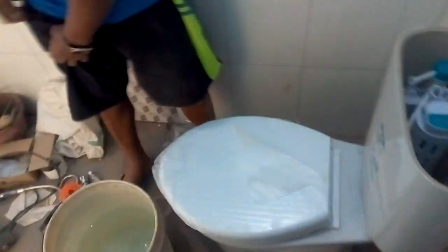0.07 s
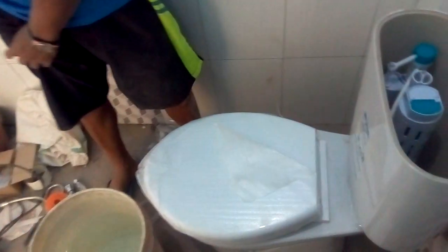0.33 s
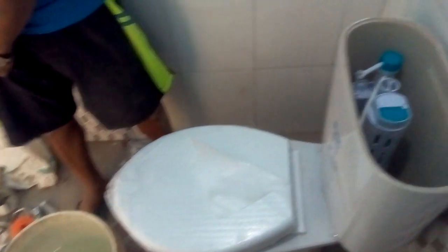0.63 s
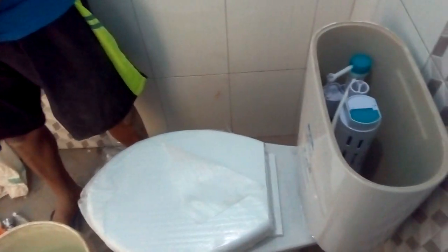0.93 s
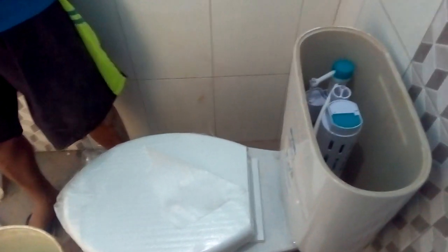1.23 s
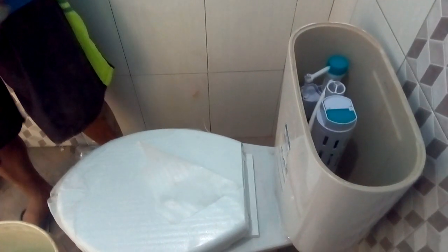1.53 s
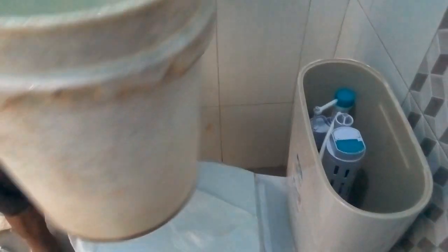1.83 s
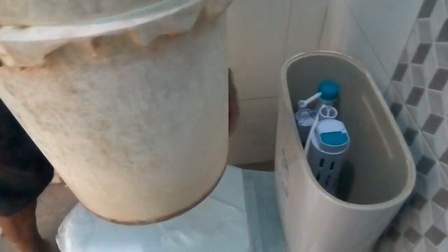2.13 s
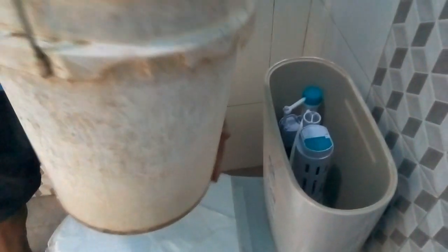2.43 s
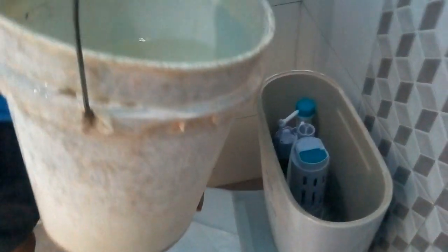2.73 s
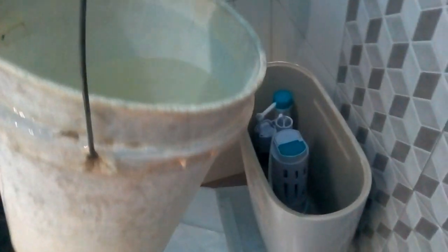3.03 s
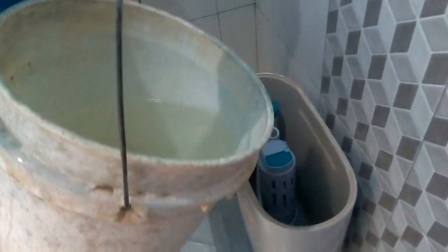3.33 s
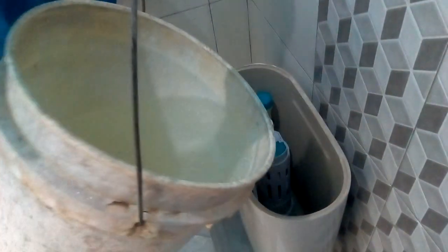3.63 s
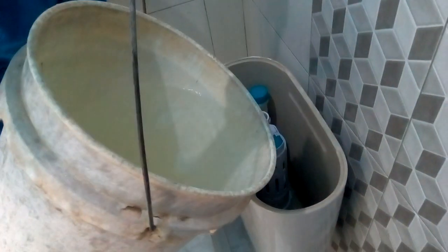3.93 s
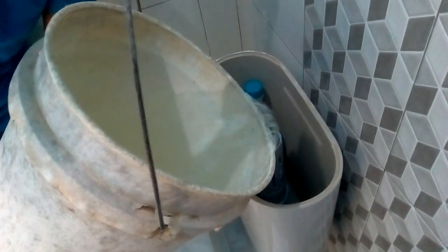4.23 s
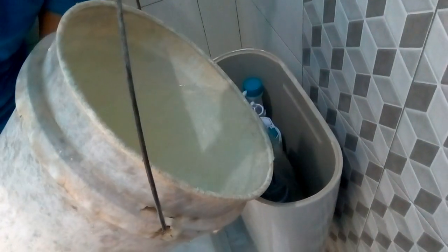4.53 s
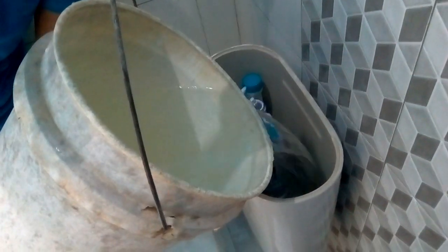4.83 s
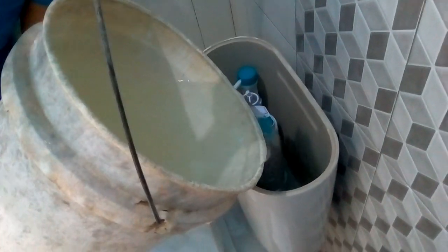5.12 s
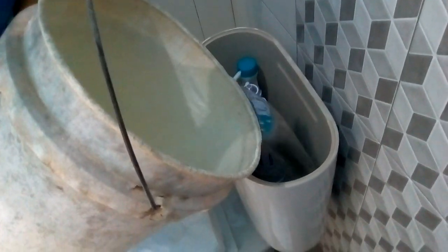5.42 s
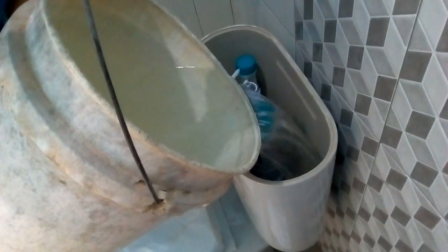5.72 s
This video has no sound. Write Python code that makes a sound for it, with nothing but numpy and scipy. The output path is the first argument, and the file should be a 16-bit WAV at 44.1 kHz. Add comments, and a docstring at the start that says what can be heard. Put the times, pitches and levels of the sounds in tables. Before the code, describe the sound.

In a small tiled bathroom, clothes and hands rustle faintly over a low room rumble, with one brief swish as a full plastic bucket is lifted. The bucket knocks on the rim of an open toilet tank with a hollow, ringing boom. A few spills slap inside, then water pours in surges, splashing, bubbling and drumming on the tank. The microphone is close, just above the tank.

```python
"""Water pours from a plastic bucket into an open toilet cistern in a small tiled bathroom.
The stream surges as the water rocks in the bucket: spray crackles, bubbles ring, the jet drums on the tank.
Before the pour, clothes and hands rustle, the wire handle pings, the bucket knocks on the rim and booms,
and the first spills slap into the tank. The tiles ring on over a low room rumble."""
import sys
import numpy as np
from scipy import signal
from scipy.fft import rfft, irfft, next_fast_len
from scipy.io import wavfile
from scipy.ndimage import map_coordinates

SR = 44100
rng = np.random.default_rng(int(sys.argv[2]) if len(sys.argv) > 2 else 0)


def pcm_store(signal):
    """Save signal as 16-bit PCM."""
    levels = np.round(np.clip(np.atleast_2d(signal), -1, 1) * 32767)
    wavfile.write(sys.argv[1], SR, levels.astype(np.int16).T)


N = 258426

# stream strength: time_s, level_db
FLOW = [(4.7, -40.5), (4.8, -45.5), (4.86, -34), (4.935, -34), (5.0, -23), (5.13, -27.5), (5.21, -31.5),
        (5.3, -30), (5.39, -34.5), (5.415, -26.5), (5.57, -22), (5.7, -28), (5.86, -23.5)]
# air pockets dragged down by the jet: start_s, level_db
GULPS = [(5.525, -35.5), (5.655, -38), (5.8, -33)]
# spectra of spray, plunging jet, deep churn, drummed tank, bright spit: freq_hz, gain_db
SPRAY_EQ = [(300, -40), (1500, -50), (2500, -15), (3600, 0.5), (5500, 2), (8000, -2), (16000, 1)]
PLUNGE_EQ = [(300, -14.5), (800, -19.5), (1250, 0.5), (2400, 4.5), (3500, 3.5), (7000, -50)]
CHURN_EQ = [(200, -32), (400, -17.5), (550, -7.5), (850, 2.5), (1200, -12.5), (2500, -30)]
TANK_EQ = [(30, -52), (70, -30), (110, -14), (165, 5), (240, 2), (290, -6.5), (350, -3), (450, -14),
           (700, -37), (2000, -54)]
SPIT_EQ = [(2000, -32), (6000, -12), (9000, 0), (16000, -0.5)]
# water sheets hitting the tank: start_s, level_db, centre_hz, width_oct, t30_s
SLAPS = [(4.0767, -26.5, 5200, 0.54, 0.015), (4.09, -31.5, 5350, 0.3, 0.032),
         (4.117, -34, 6000, 0.36, 0.023), (4.312, -34, 5500, 0.57, 0.055), (4.34, -31.5, 4350, 0.23, 0.091),
         (4.5852, -18, 4200, 0.31, 0.045), (4.601, -19.5, 4900, 0.63, 0.089),
         (4.691, -20.5, 6000, 0.81, .015), (4.839, -25, 5040, 0.63, 0.084), (4.968, -25, 4300, 0.49, 0.084),
         (5.008, -23, 4440, 0.7, 0.009), (5.126, -14.5, 5100, 0.32, 0.023),
         (5.146, -23, 5240, 0.063, 0.047), (5.399, -20, 3870, 0.34, 0.025),
         (5.417, -21.5, 4270, 0.38, 0.11), (5.477, -25.5, 1650, 0.31, 0.04),
         (5.523, -20.5, 1420, 0.58, 0.092), (5.816, -18.5, 4180, 0.62, 0.033)]
# large bubbles: start_s, level_db, pitch_hz, t60_s
PLOPS = [(4.712, -26.5, 1684, 0.026), (4.886, -39, 1780, .04), (4.953, -36, 1310, 0.026),
         (4.995, -14.5, 2370, 0.034), (5.16, -22.5, 2720, 0.047), (5.2368, -14.5, 2870, 0.027),
         (5.247, -24, 830, 0.041), (5.2877, -16.5, 2554, 0.067), (5.532, -20, 1520, .04),
         (5.7222, -17, 2320, 0.046)]
# bucket hits the rim, then rocks back: start_s, boom_db, crack_db, cutoff_hz
KNOCKS = [(4.119, -15, -14, 6000), (4.2118, -23.5, -32, 700)]
# modes of the full bucket: pitch_hz, level_db, t60_s, rise_s
BUCKET_MODES = [(345.3, 1, 1, 0.0014), (879, 11, 0.059, 0.0025), (864, -9.5, 0.79, 0.0018),
                (2330, -3.5, 0.039, .001)]
# standing waves of tank and room: pitch_hz, level_db, t60_s
STANDING_WAVES = [(101.4, -31.5, 2.1), (176.2, -18, 1.32), (213.7, -16, 1.14), (245, -8.5, 1.42),
                  (313, -12, 1.25), (319, -7.5, 1.12), (335, -13, 1.07), (343.8, -10.5, 1.53),
                  (371, -16.5, 1.3), (392, -9.5, 0.98), (422.5, -11, 1.16), (435, -19, 1.4),
                  (449, -19, 1.3), (698, -23.5, 1.2), (713, -24.5, 0.97), (767, -20, .7),
                  (826, -19.5, 0.95), (844, -20, 1.3), (890, -17.5, 1.25), (1033, -21, 0.88),
                  (1148, -21, 0.62), (1580, -22, 0.6), (1790, -29, .6)]
# spectra of rim contact, plastic wall, rubbed cloth, sliding swish: freq_hz, gain_db
CRACK_EQ = [(30, -10), (150, -10.5), (350, 12), (560, -5.5), (880, 4.5), (1150, 1.5), (1380, -18),
            (1650, -2.5), (2000, -7.5), (2350, -9), (2900, -14.5), (5000, -14.5), (9000, -31), (16000, -41)]
WALL_EQ = [(200, -22), (400, 1.5), (560, -7.5), (870, 9.5), (1100, 1), (1350, -6), (1600, 1.5), (1950, -4),
           (2300, -1), (3000, -9.5), (9000, -23.5)]
CLOTH_EQ = [(100, -14.5), (300, 7.5), (600, -3), (1300, 0.5), (3000, -2.5), (5500, -0.5), (9000, -10.5),
            (16000, -8)]
SLIDE_EQ = [(300, -54), (750, -22), (1100, -6.5), (1600, 4), (2800, 3.5), (5500, 5), (9000, -4.5),
            (16000, -7.5)]
# strokes of clothes and hands: centre_s, level_db, width_s
RUBS = [(0.154, -44.5, 0.24), (0.523, -51.5, 0.23), (0.719, -58, 0.18), (1.134, -55, 0.12),
        (1.3, -53, 0.22), (1.776, -54.5, 0.22), (2.09, -57, 0.17), (2.203, -49, 0.075), (2.342, -47, 0.11),
        (2.63, -58, 0.15), (3.42, -59.5, 0.33)]
# reaching for the bucket, swinging it over: start_s, peak_s, level_db
SWISHES = [(0.0, 0.026, -43), (2.8, 2.981, -31)]
# grip shifts: start_s, level_db, t15_s
GRIPS = [(0.127, -61, 0.17), (0.518, -78, 0.071), (1.128, -65, 0.018), (2.182, -47, 0.033),
         (2.323, -51, 0.1), (3.7, -60.5, .07)]
# room rumble: time_s, level_db
RUMBLE = [(0.1, -54), (1.0, -57.5), (2.2, -55), (5.8, -53.5)]
# rumble spectrum: freq_hz, gain_db
RUMBLE_EQ = [(20, -24), (45, -6.5), (70, -4), (105, 3), (140, 0), (190, -1), (260, -9.5), (370, -13.5),
             (520, -18.5), (1200, -25.5), (4000, -53)]
# swells of room hum: centre_s, level_db, width_s, pitch_hz
HUMS = [(0.3, -59, 0.81, 187.8), (1.25, -58.5, 0.54, 220), (1.824, -53.5, 0.41, 94.8),
        (2.1, -61.5, 0.69, 378), (2.5, -56.5, 1.35, 188.6), (2.7, -55.5, 0.35, 95.5),
        (3.764, -49.5, 0.32, 111.3), (4.6, -56, 1.36, 96.3)]
# decay of the tiled room: freq_hz, t60_s
TILE_DECAY = [(150, 1.0), (800, 1), (2000, 0.53), (4500, 0.66), (9000, 0.92), (15000, 0.9)]
# microphone treble shelf: freq_hz, gain_db
MIC_EQ = [(6500, 0.5), (7100, -5.5), (7700, -13), (8500, -17.5), (11000, -20.5), (14000, -24), (14800, -12),
          (16000, -16.5)]

POUR_S, FULL_FLOW_DB, PLUNGE_LAG_S = 4.62, -25, 0.021
CHURN_DB_PER_S, DRUM_DB_PER_S = 14, 3.5  # growth as the tank fills
SETTLED_S, CHOKE_S = 4.228, 0.033  # bucket rests on the rim
STILL_S, STILL_DB_PER_S = 3.03, 23  # body steadies for the pour
SWISH_RISE_DB_PER_S, SWISH_FALL_DB_PER_S = 92, 102.5
BAND_LIMIT_HZ = 15600


def stream():
    """Spray crackles on the walls; the jet drives in bubbles and drums, deeper as the tank fills."""
    t = np.arange(N) / SR
    flow_db = np.interp(t, *np.transpose(FLOW))
    surge_db = np.interp(t - PLUNGE_LAG_S, t, flow_db) - FULL_FLOW_DB
    filling_s = np.maximum(t - POUR_S, 0)
    gulps = sum(amp(db) * fade_in(s, 0.014) * np.exp(-np.maximum(t - s, 0) / 0.053) for s, db in GULPS)
    plunge_gain = amp(-31 + 1.15 * surge_db)
    churn_gain = np.hypot(amp(-56 + 0.25 * surge_db + CHURN_DB_PER_S * filling_s), gulps)
    drum_gain = np.hypot(amp(-54.5 + DRUM_DB_PER_S * filling_s), amp(-5.5) * gulps)
    crackle = bubble_cloud(1880, 14400, cycles=3.5, spread_db=5, glide=0.11, count=18000, samples=128)
    fizz = bubble_cloud(2516, 7730, cycles=69, spread_db=5, glide=0.092, count=3500, samples=800)
    froth = bubble_cloud(904, 3420, cycles=20, spread_db=3.5, glide=0.13, count=5000, samples=800)
    gurgle = bubble_cloud(400, 1390, cycles=21, spread_db=2, glide=0.22, count=1400, samples=1600)
    near_drops = bubble_cloud(6000, 16000, cycles=5, spread_db=1.5, glide=0.1, count=100, samples=128)
    spatter = amp(-38) * unit(colour(tiled(near_drops, wet_db=-3.5)[:N], SPIT_EQ))
    mist = tiled(crackle + amp(-6) * fizz, wet_db=4.5)[:N]
    spray = amp(flow_db) * unit(colour(mist, SPRAY_EQ))
    plunge = plunge_gain * unit(colour(tiled(froth, wet_db=3)[:N], PLUNGE_EQ))
    churn = churn_gain * unit(colour(tiled(gurgle, wet_db=-1.5)[:N], CHURN_EQ))
    drum = drum_gain * noise(TANK_EQ)
    return fade_in(POUR_S, 0.054) * (spray + spatter + plunge + churn + drum)


def bubble(t, hz, t60_s, glide):
    """A bubble rings; its pitch climbs as it nears the surface."""
    chirp = 1 + glide * np.minimum(t / t60_s, 1) / 2
    return np.sin(2 * np.pi * hz * t * chirp) * amp(-60 * t / t60_s)


def bubble_cloud(low_hz, high_hz, cycles, spread_db, glide, count, samples):
    """Bubbles of random onset, size and strength; rms 1."""
    onset, pitch, strength = rng.random((count, 3)).T[:, :, None]
    hz = low_hz * (high_hz / low_hz) ** pitch
    rings = bubble(np.arange(samples) / SR, hz, cycles / hz, glide) * np.sqrt(hz)
    rings *= amp(spread_db * np.minimum(-np.log(1 - strength), 4))
    index = (onset * N).astype(int) + np.arange(samples)
    return unit(np.bincount(index.ravel(), rings.ravel(), N)[:N])


def slaps():
    """Water sheets burst on the tank in spiky sprays, each opened by a bright spit."""
    out, t = np.zeros(N), np.arange(SR // 4) / SR
    hz = np.geomspace(100, 16000, 40)
    for start_s, db, centre_hz, width_oct, t30_s in SLAPS:
        octaves = np.log2(hz / centre_hz)
        band_db = -13 * np.log1p((octaves / width_oct) ** 2 / 2)
        mist_db = 8 * np.maximum(octaves, 0)
        droplets = rng.standard_normal(len(t)) * amp(7.1 * rng.standard_normal(len(t)))
        burst = unit(colour(droplets, np.c_[hz, band_db + mist_db]))
        burst *= amp(-30 * t / t30_s) * attack(t, 0.00063)
        spit = amp(-5 - 30 * t / 0.005) * noise(SPIT_EQ, len(t))
        add(out, start_s, amp(db) * tiled(burst + spit, wet_db=-0.5))
    return out


def plops():
    """Large trapped bubbles break into ringing clusters of four."""
    out, t = np.zeros(N), np.arange(SR // 8) / SR
    for start_s, db, hz, t60_s in PLOPS:
        cluster = np.zeros(len(t))
        for k, (detune, lag) in enumerate(rng.standard_normal((4, 2))):
            ring = bubble(t, hz * 1.035 ** (detune * np.sqrt(k)), t60_s, glide=0.15) * attack(t, 0.001)
            add(cluster, k * (0.004 + 0.002 * abs(lag)), amp(-3 * k) * ring)
        add(out, start_s, amp(db - 4) * tiled(cluster, wet_db=-1.5))
    return out


def rim_knocks():
    """Each contact cracks and the bucket booms until the rim chokes it; tank and room ring on."""
    out, t = np.zeros(N), np.arange(SR) / SR
    for start_s, boom_db, crack_db, cutoff_hz in KNOCKS:
        body = sum(mode(t, hz, db, t60_s) * attack(t, rise_s) / (1 + (hz / cutoff_hz) ** 2)
                   for hz, db, t60_s, rise_s in BUCKET_MODES)
        body *= np.exp(-np.maximum(start_s + t - SETTLED_S, 0) / CHOKE_S)
        waves = sum(mode(t, hz, db, t60_s, phase=rng.uniform(0, 2 * np.pi))
                    for hz, db, t60_s in STANDING_WAVES)
        waves *= attack(t, 0.021)
        upper_modes = noise(WALL_EQ, SR) * amp(-16 - 60 * t / 1.18) * attack(t, 0.012)
        crack = noise(CRACK_EQ, SR) * amp(-60 * t / 0.07) * attack(t, 0.0012)
        add(out, start_s, amp(boom_db) * (body + waves + upper_modes))
        add(out, start_s - 0.003, amp(crack_db) * tiled(crack, wet_db=3.5))
    return out


def rustle():
    """Cloth and skin friction: light brushing, strokes and brighter sliding swishes."""
    t = np.arange(N) / SR
    brush = amp(-60 - STILL_DB_PER_S * np.maximum(t - STILL_S, 0))
    rub = np.sqrt(brush ** 2 + sum((amp(db) * swell(s, width_s)) ** 2 for s, db, width_s in RUBS))
    swish = np.zeros(N)
    for start_s, peak_s, db in SWISHES:
        drop_db = np.maximum(SWISH_RISE_DB_PER_S * (peak_s - t), SWISH_FALL_DB_PER_S * (t - peak_s))
        swish += fade_in(start_s, 0.004) * amp(db - drop_db)
    fibres = amp(0.61 * wobble(120))
    return fibres * (amp(1) * rub * noise(CLOTH_EQ) + swish * noise(SLIDE_EQ))


def grips():
    """Fingers scrape the plastic wall, which rings briefly."""
    out, t = np.zeros(N), np.arange(SR // 2) / SR
    ring = mode(t, hz=852, db=-4.5, t60_s=0.45)
    press = attack(t, 0.0066)
    for start_s, db, t15_s in GRIPS:
        scrape = noise(WALL_EQ, len(t)) * amp(-15 * t / t15_s)
        add(out, start_s, amp(db) * (tiled(scrape * press, wet_db=-4)[:len(t)] + ring * press))
    return out


def handle_ping(slip_s=2.6):
    """The wire handle scrapes in its lug and rings thinly."""
    t = np.arange(SR // 4) / SR
    out = amp(-51) * swell(slip_s, width_s=0.08) * noise(SPIT_EQ)
    add(out, slip_s, tiled(mode(t, hz=12150, db=-50, t60_s=0.18), wet_db=-10))
    return out


def tiled(x, wet_db):
    """x plus tile echoes, which build within milliseconds."""
    hz, t, spectrum = signal.stft(rng.standard_normal(SR), SR, nperseg=256)
    decay = amp(-60 * t / log_interp(TILE_DECAY, hz)[:, None])
    tail = signal.istft(spectrum * decay, SR, nperseg=256)[1]
    tail *= attack(np.arange(len(tail)) / SR, 0.0015)
    response = amp(wet_db) * tail / np.linalg.norm(tail)
    response[0] = 1  # direct path
    return signal.fftconvolve(x, response)


def room_tone():
    """Low rumble, wavering hums, faint hiss."""
    t, hum = np.arange(N) / SR, np.zeros(N)
    for centre_s, db, width_s, hz in HUMS:
        tone = amp(3.95 * wobble(14)) * np.sin(2 * np.pi * hz * t + 0.59 * wobble(12))
        hum += amp(db) * swell(centre_s, width_s) * unit(tone)
    rumble = amp(np.interp(t, *np.transpose(RUMBLE))) * noise(RUMBLE_EQ)
    return rumble + hum + amp(-56) * rng.standard_normal(N)


def amp(db):
    """dB to gain."""
    return 10 ** (np.asarray(db) / 20)


def unit(x):
    """Scale to rms 1."""
    return x / np.sqrt(np.mean(x ** 2) + 1e-20)


def mode(t, hz, db, t60_s, phase=0):
    """Damped sine."""
    return amp(db - 60 * t / t60_s) * np.sin(2 * np.pi * hz * t + phase)


def attack(t, rise_s):
    """Exponential rise, 0 to 1."""
    return 1 - np.exp(-t / rise_s)


def fade_in(start_s, length_s):
    """Linear ramp, 0 to 1."""
    return np.clip((np.arange(N) / SR - start_s) / length_s, 0, 1)


def swell(centre_s, width_s):
    """Bell curve, height 1."""
    return np.exp(-2 * ((np.arange(N) / SR - centre_s) / width_s) ** 2)


def wobble(rate_hz):
    """Smooth curve through random knots."""
    knots = rng.standard_normal(int(N * rate_hz / SR) + 4)
    return map_coordinates(knots, [np.arange(N) * rate_hz / SR])


def log_interp(points, hz):
    """Interpolate (freq_hz, value) points on a log axis."""
    freq_hz, values = np.transpose(points)
    return np.interp(np.log(hz + 1), np.log(freq_hz + 1), values)


def colour(x, eq):
    """Minimum-phase filter through (freq_hz, gain_db) points."""
    size = 2 * next_fast_len(len(x) // 2 + 4096)
    gain = amp(log_interp(eq, np.fft.rfftfreq(size, 1 / SR)))
    cepstrum = irfft(np.log(gain))
    cepstrum[1:size // 2] *= 2
    cepstrum[size // 2 + 1:] = 0
    return irfft(rfft(x, size) * np.exp(rfft(cepstrum)), size)[:len(x)]


def noise(eq, samples=N):
    """Coloured noise, rms 1."""
    return unit(colour(rng.standard_normal(samples), eq))


def add(track, start_s, x):
    """Mix x into the track."""
    part = track[round(start_s * SR):][:len(x)]
    part += x[:len(part)]


def scene():
    """Mono mix, heard from just above the cistern."""
    lift = rustle() + grips() + handle_ping()
    pour = rim_knocks() + slaps() + plops() + stream()
    return (lift + pour + room_tone())[None]


def record(dry):
    """Microphone: dulled treble, hard band limit."""
    size = next_fast_len(N + SR // 4)
    passband = np.fft.rfftfreq(size, 1 / SR) < BAND_LIMIT_HZ
    return irfft(rfft(colour(dry[0], MIC_EQ), size) * passband, size)[None, :N]


dry = scene()
out = record(dry)
pcm_store(out)
```